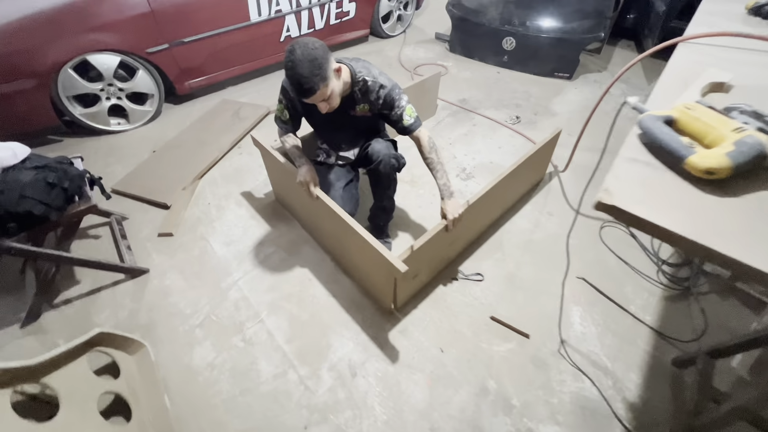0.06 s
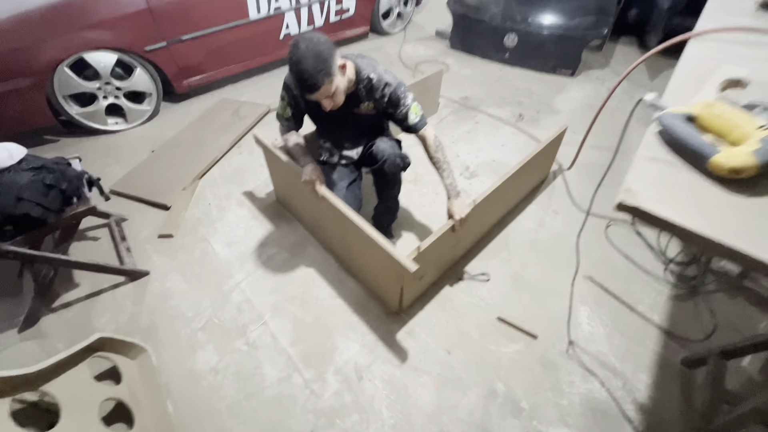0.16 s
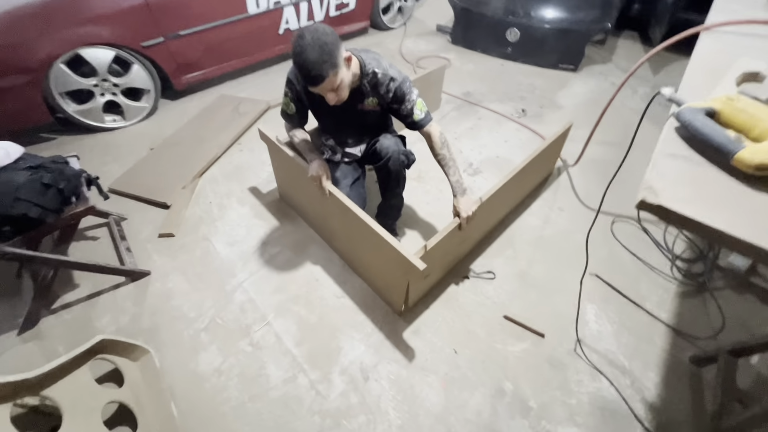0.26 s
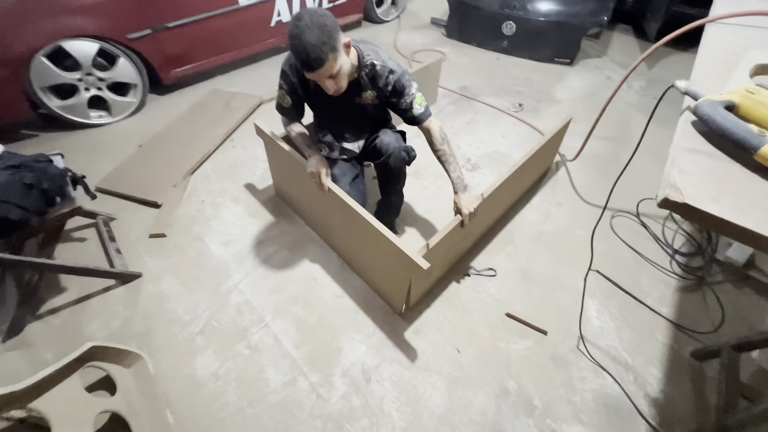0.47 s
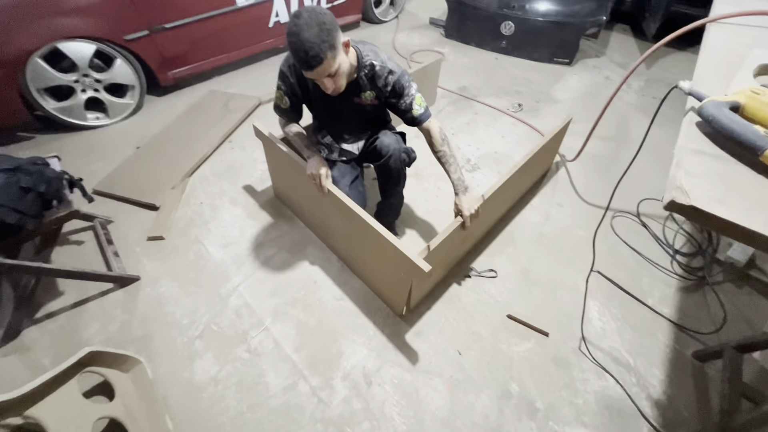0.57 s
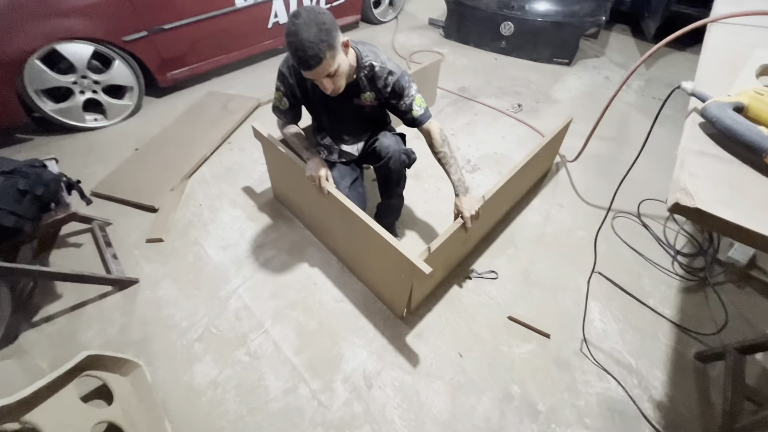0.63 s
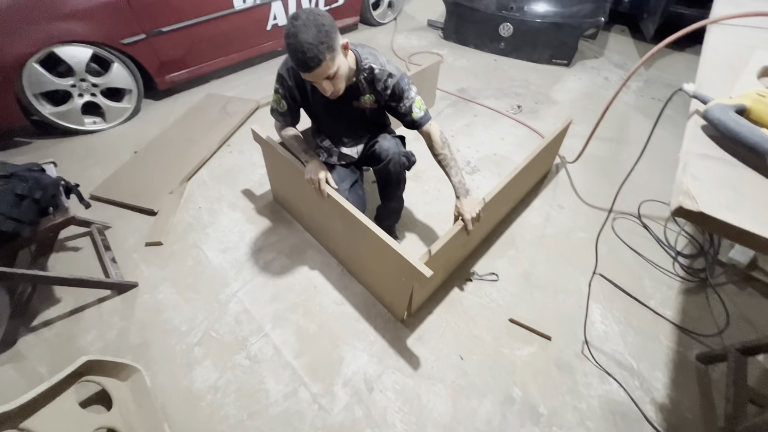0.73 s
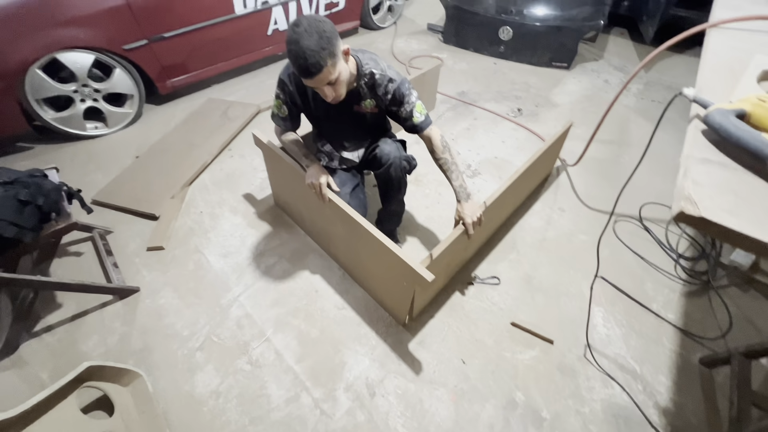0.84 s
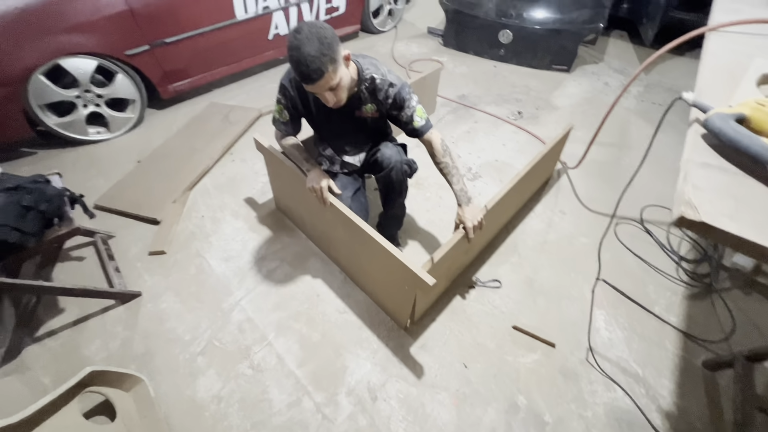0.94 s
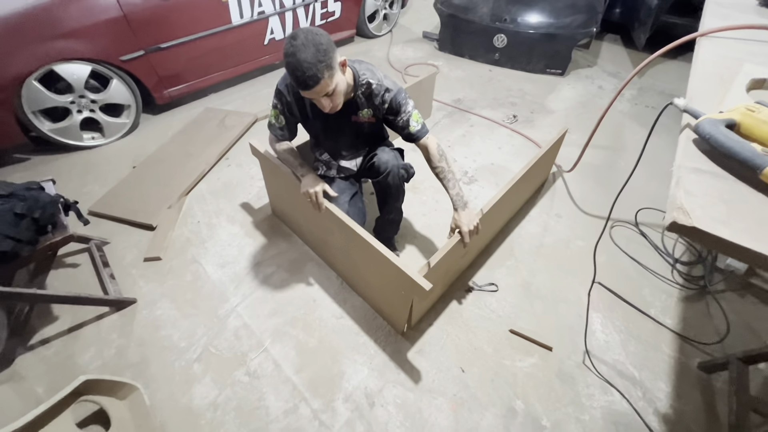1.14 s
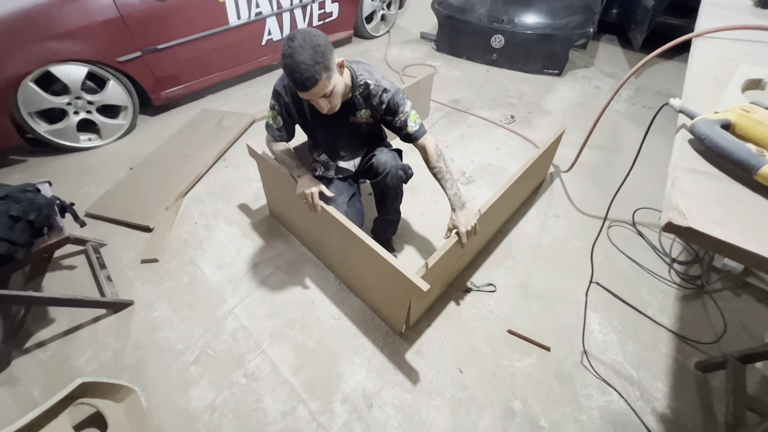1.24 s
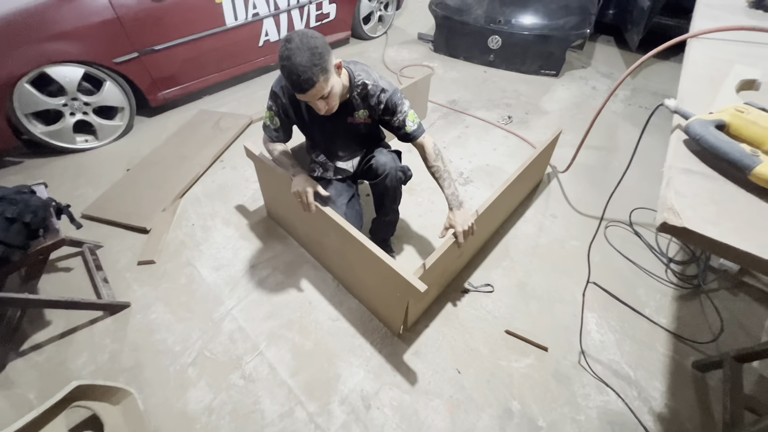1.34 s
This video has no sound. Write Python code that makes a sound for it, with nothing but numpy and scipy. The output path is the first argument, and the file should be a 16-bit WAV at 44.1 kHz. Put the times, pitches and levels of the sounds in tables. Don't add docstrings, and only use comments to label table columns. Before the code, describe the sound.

Large wooden panels clatter against each other, rattle and briefly scrape in an echoing concrete hall.

```python
import sys
import numpy as np
from scipy import signal
from scipy.fft import rfft, irfft
from scipy.io import wavfile
from scipy.ndimage import uniform_filter1d

SR = 44100
rng = np.random.default_rng(int(sys.argv[2]) if len(sys.argv) > 2 else 0)


def wrap_up_sound(samples):
    columns = np.atleast_2d(samples).T
    tamed = np.clip(columns, -1, 1)
    steps = np.round(tamed * 32767).astype(np.int16)
    wavfile.write(sys.argv[1], SR, steps)


def field_ratio(decibels):
    return 10 ** (np.asarray(decibels, dtype=float) / 20)


N = 61739

# t/s, level/dB, contact/ms, loudest tone f/Hz
CLACKS = [(0.1029, -46.5, 4.4, 1440), (0.1084, -39.5, 3.5, 1440), (0.241, -39, 3, 1260),
          (0.244, -33, 3.5, 1230), (.252, -33.5, 4, 1400), (0.271, -38, 4.21, 1750), (.347, -12, 2.6, 1550),
          (.3515, -19.5, 2.502, 1350), (.356, -22.5, 2.415, 2120), (0.389, -29, 8, 1760),
          (1.381, -51, 1.48, 1700), (1.388, -55, 1.24, 1580), (1.3945, -50.5, 1.7, 1600),
          (0.3591, -21.5, 1.99, 1330), (.259, -35.5, 4.07, 1270), (0.7436, -45, 2.06, 1550),
          (.365, -29, 5.5, 1800), (.374, -34, 3.47, 1230), (0.723, -54.5, 1.52, 2600),
          (0.7568, -45, 2.3, 900)]
PUFF_PATCHY_DB = 1.2
BOARD_LEAN_DB, SCRAPE_LEAN_DB, HALL_LEAN_DB = 2.5, -0.5, 2.5


def evened(x):
    return x / np.sqrt(np.mean(x ** 2) + 1e-20)


def read(points, hz):
    f, value = np.transpose(points)
    return np.interp(np.log(hz + 1), np.log(f + 1), value)


def colour(x, points):
    gain = field_ratio(read(points, np.fft.rfftfreq(x.shape[-1], 1 / SR)))
    return irfft(rfft(x) * gain, x.shape[-1])


def pair(a, b):
    # f/Hz, left-right coherence/1
    likeness = [(40, 0.8), (150, 1), (270, 0.59), (450, 0.033), (800, 0.12), (1300, 0.12), (3000, 0.013),
                (9000, 0.01)]
    same = np.clip(read(likeness, np.fft.rfftfreq(len(a), 1 / SR)), 0, 1)
    right = irfft(same * rfft(a) + np.sqrt(1 - same ** 2) * rfft(b), len(a))
    return np.array([a, right])


def placed(x, lean_db):
    return x * field_ratio(np.array([[.5], [-.5]]) * lean_db)


def tilted(x):
    # f/Hz, left minus right/dB
    edge_lean = [(700, -1.5), (1300, 2), (2200, 3), (4400, 6.5)]
    return irfft(placed(rfft(x), read(edge_lean, np.fft.rfftfreq(N, 1 / SR))), N)


def noise(points, patchy_db):
    # f/Hz, left minus right/dB
    noise_lean = [(60, 5.5), (400, 5.5), (1200, 6), (3300, 5.5), (5500, 16), (7500, 7), (8800, 2),
                  (10500, 1.4)]
    hz, _, z = signal.stft(pair(*rng.standard_normal((2, N))), SR, nperseg=1024, noverlap=768)
    patches = uniform_filter1d(rng.standard_normal(z.shape[1:]), 10, 0)
    patches = evened(uniform_filter1d(patches, 12, 1))
    lean = read(noise_lean, hz)[:, None] / 2
    z = z * field_ratio(read(points, hz)[:, None] + patchy_db * patches + np.array([lean, -lean]))
    return evened(signal.istft(z, SR, nperseg=1024, noverlap=768)[1][:, :N])


def ring(modes, hits, fall_db, port_turn):
    detune, scatter_rad, spot_db = .009, 0.95, 5.5
    port_turn_hz = 565
    out = np.zeros((2, N + SR))
    t = np.arange(SR // 4) / SR
    hz, db, t60 = np.transpose(modes)[:, :, None]
    side = rng.choice([-1., 1.], hz.shape) * np.array([-1, 1])[:, None, None]
    turn = port_turn * side * np.minimum(hz / port_turn_hz, 1)
    for s, hit_db, contact_ms, tone_hz in hits:
        pitch_luck, level_luck, phase_luck = rng.standard_normal((3, len(modes), 1))
        press = contact_ms / 1000
        phase = 2 * np.pi * hz * (1 + detune * pitch_luck) * (t - press)
        tones = np.cos(phase + scatter_rad * phase_luck + turn)
        octaves = abs(np.log2(hz / tone_hz))
        level_db = db + spot_db * level_luck - fall_db * octaves
        rise = np.sin(np.pi / 2 * np.minimum(t / press, 1)) ** 2
        sound = (field_ratio(level_db - 60 * t / t60) * tones).sum(1) * rise
        out[:, round(s * SR):][:, :len(t)] += field_ratio(hit_db) * sound / abs(sound.mean(0)).max()
    return out[:, :N]


def knocked_bodies():
    # t/s, level/dB, contact/ms, loudest tone f/Hz
    knocks = [(.001, -47, 1.5, 221), (0.111, -42.5, 1.1, 213), (0.134, -46.5, 3.1, 200),
              (0.2393, -34, 2.84, 420), (0.2467, -20, 6.56, 302), (.269, -27, 6.14, 248),
              (0.285, -24.5, 6.06, 268), (0.311, -29, 4.46, 191), (0.3485, -26, 2.3, 417),
              (.353, -20.5, 4.62, 265), (0.361, -26.5, 4.1, 420), (.370, -21, 4.93, 330),
              (.378, -20.5, 5.99, 287), (0.401, -27.5, 5.06, 295), (.42, -24, 6.68, 410),
              (0.42, -33.5, 5.96, 243), (.437, -24.5, 7.4, 240), (0.476, -43, 6.3, 400),
              (0.499, -36, 6.5, 306), (0.555, -39.5, 11.5, 265), (0.2966, -36.5, 4.4, 238),
              (0.332, -35.5, 4, 244), (.384, -22, 4.01, 300)]
    # f/Hz, level/dB, t60/s
    body_modes = [(162, -17, 0.11), (200, -10, 0.15), (238.4, -6.5, 0.14), (265, -1, 0.082),
                  (318, -1.5, 0.046), (340, -25.5, 0.052), (404.8, -9, 0.095), (427.4, -9.5, 0.11),
                  (580, -7.5, 0.095)]
    return ring(body_modes, knocks, fall_db=5.5, port_turn=0.79)


def clacking_edges():
    # f/Hz, level/dB, t60/s
    edge_modes = [(718, -16, 0.18), (755, -3.5, 0.054), (958, -22, 0.082), (1106, -4, 0.035),
                  (1221, -4.5, 0.072), (1220, -12, 0.022), (1400, -7.5, 0.078), (1390, -4.5, 0.022),
                  (1633, -7, 0.073), (1720, -6, 0.033), (1810, -13, 0.045), (2024, -0.5, 0.03),
                  (2196, -1, 0.013), (2653, -22.5, 0.033)]
    return ring(edge_modes, CLACKS, fall_db=7, port_turn=0.67)


def cracks():
    # f/Hz, density/dB per Hz
    crack_colour = [(700, -20), (900, 2), (2200, 4), (2900, -3), (3700, -11), (6000, -10), (8000, -15),
                    (12000, -25)]
    crack_db, crack_s = -34.5, 0.0036
    shape = np.zeros(N + SR)
    u = np.arange(SR // 10) / SR / crack_s
    for s, db, *_ in CLACKS:
        shape[round(s * SR):][:len(u)] += field_ratio(db + crack_db) * u * np.exp(1 - u)
    return shape[:N] * noise(crack_colour, PUFF_PATCHY_DB)


def rattles():
    # t/s, level/dB, t60/s
    buzzes = [
        (.108, -51.5, 0.42),
        (0.243, -43.5, 1),
        (.352, -41, 0.63),
    ]
    # f/Hz, density/dB per Hz
    buzz_colour = [(400, -15), (650, 3.5), (900, 2.5), (1500, -0.5), (2100, -5), (2700, -14.5),
                   (3500, -19.5), (5000, -34.5)]
    rise_s = 0.024
    u = np.maximum(np.arange(N) / SR - np.array(buzzes)[:, :1], 0)
    db, t60 = np.transpose(buzzes)[1:, :, None]
    shape = (field_ratio(db - 60 * u / t60) * np.minimum(u / rise_s, 1)).sum(0)
    return shape * noise(buzz_colour, patchy_db=2.0)


def scrape():
    # t/s, level/dB
    stroke_points = [
        (0.7158, -49),
        (0.719, -47),
        (0.723, -44.5),
        (0.731, -46),
        (0.745, -43),
        (0.759, -43),
        (0.773, -46.5),
        (0.788, -53),
        (.84, -76),
    ]
    # f/Hz, density/dB per Hz
    grit_colour = [(350, -1.5), (650, 2.5), (950, 2.5), (1500, 1), (2200, -1), (3250, -3.5), (3600, -9.5),
                   (9000, -47)]
    swish_colour = [(3000, -20), (4000, -4), (6500, 0), (9300, -1), (10500, -15)]
    grains_per_s, spread_db = 12000, 3.5
    swish_db, late_s, smear_s = -13.5, 0.0038, 0.028
    grains = (rng.random((2, N)) < grains_per_s / SR) * rng.choice([-1., 1.], (2, N))
    sizes_db = spread_db * np.minimum(rng.exponential(1, (2, N)), 5)
    grains = pair(*grains * field_ratio(sizes_db))
    s, db = np.transpose(stroke_points)
    stroke = field_ratio(np.interp(np.arange(N) / SR, s, db, -120, -120))
    dust = uniform_filter1d(np.roll(stroke, round(late_s * SR)), round(smear_s * SR))
    swish = field_ratio(swish_db) * dust * noise(swish_colour, PUFF_PATCHY_DB)
    return stroke * evened(colour(grains, grit_colour)) + swish


def thumps():
    # t/s, level/dB, f/Hz, t60/s
    rocks = [(0.118, -45, 86.9, 0.33), (0.182, -45, 110, 0.17), (0.253, -39.5, 101.4, 0.12),
             (0.284, -39.5, 78, 0.42), (0.354, -37, 93, 0.202), (0.43, -39, 142, 0.086),
             (0.447, -43, 51, 0.28), (0.491, -38.5, 114.3, 0.34), (0.559, -36, 117.9, 0.079),
             (0.622, -37.5, 66.2, 0.066), (0.679, -45, 112.1, 0.1), (0.823, -55, 45.5, 0.15),
             (0.514, -43.5, 104, 0.099)]
    rise_s = 0.0056
    t = np.arange(N) / SR
    out = np.zeros(N)
    for s, db, hz, t60 in rocks:
        u = np.maximum(t - s, 0)
        rise = np.sin(np.pi / 2 * np.minimum(u / rise_s, 1)) ** 2
        out += field_ratio(db + 2.5 - 60 * u / t60) * rise * np.sin(2 * np.pi * hz * u)
    return out


def hall(x):
    # f/Hz, t60/s
    hall_decay = [(60, 1.2), (250, 0.9), (700, 0.71), (1500, 0.58), (3000, 0.67), (8000, 0.38)]
    gap_s = 0.01
    taps = np.zeros((2, SR))
    at = np.arange(0, SR - 20, 20) + rng.integers(0, 20, (2, (SR - 1) // 20))
    np.put_along_axis(taps, at, rng.choice([-1., 1.], at.shape), 1)
    hz, t, z = signal.stft(pair(*taps), SR, nperseg=256)
    decay = field_ratio(-60 * t / read(hall_decay, hz)[:, None])
    tail = signal.istft(z * decay, SR, nperseg=256)[1]
    tail = tail * np.minimum(np.arange(tail.shape[1]) / SR / gap_s, 1) ** 2
    return signal.fftconvolve(x[None], tail / np.linalg.norm(tail[0]), axes=1)[:, :N]


def earlier_knock():
    # f/Hz, density/dB per Hz
    earlier_colour = [(88, -28), (150, -0.5), (263, -2), (544, -21), (742, -7.5), (1540, -2.5), (1650, -16),
                      (1820, -1.5), (2600, -18.5), (3380, -19), (5720, -120)]
    level_db, t60 = -49.5, 0.74
    return field_ratio(level_db - 60 * np.arange(N) / SR / t60) * noise(earlier_colour, PUFF_PATCHY_DB)


def drone():
    # f/Hz, bandwidth/Hz, level/dB
    machines = [(588, 30, -82.5), (1022, 117, -74), (1715, 480, -71), (2600, 420, -78.5)]
    hz = np.fft.rfftfreq(N, 1 / SR)
    z = rfft(pair(*rng.standard_normal((2, N))))
    out = np.zeros((2, N))
    for f, band_hz, db in machines:
        resonance = 1 / (1 + (2 * (hz - f) / band_hz) ** 2)
        out += field_ratio(db) * evened(irfft(z * resonance, N))
    return out


def noise_floor():
    # f/Hz, density/dB per Hz
    hum_colour = [(18, -6.5), (30, 4), (124, -10.5), (236, -6), (294, -16.5), (750, -21.5), (3600, -27),
                  (4680, -76)]
    hiss_colour = [(2600, -59), (3700, -13.5), (5200, -9.5), (7200, -2.5), (9300, -2.5), (10500, -14.5),
                   (12500, -13.5), (15300, -7.5)]
    return field_ratio(-62) * noise(hum_colour, patchy_db=1.2) + field_ratio(-60) * noise(hiss_colour, patchy_db=1.87)


def scene():
    body, edge, puff = knocked_bodies(), clacking_edges(), cracks()
    slide, low = scrape(), thumps()
    sent = field_ratio(-9.5) * body[0] + field_ratio(-12) * edge[0] + field_ratio(-5) * puff[0]
    sent = sent + field_ratio(-8) * slide[0] + field_ratio(-6.5) * low
    near = placed(body + puff + low, BOARD_LEAN_DB) + tilted(edge)
    near = near + tilted(placed(slide, SCRAPE_LEAN_DB))
    far = placed(hall(sent) + drone(), HALL_LEAN_DB)
    return near + far + rattles() + earlier_knock() + noise_floor()


def band_limit(x):
    return signal.sosfilt(signal.butter(12, 16440, fs=SR, output="sos"), x)


def record(dry):
    antiphase_bands = [(10250, 11050), (13100, 14400)]
    joined_hz, top_hz, bottom_hz = 10000, 15800, 40
    hz, z = np.fft.rfftfreq(N, 1 / SR), rfft(dry)
    flipped = sum((hz > lo) & (hz < hi) for lo, hi in antiphase_bands) > 0
    z[1] = np.where(hz > joined_hz, np.where(flipped, -z[0], z[0]), z[1])
    limits = (hz < top_hz) / np.sqrt(1 + (bottom_hz / (hz + 1)) ** 6)
    return band_limit(irfft(z * limits, N))


dry = scene()
out = record(dry)
wrap_up_sound(out)
```